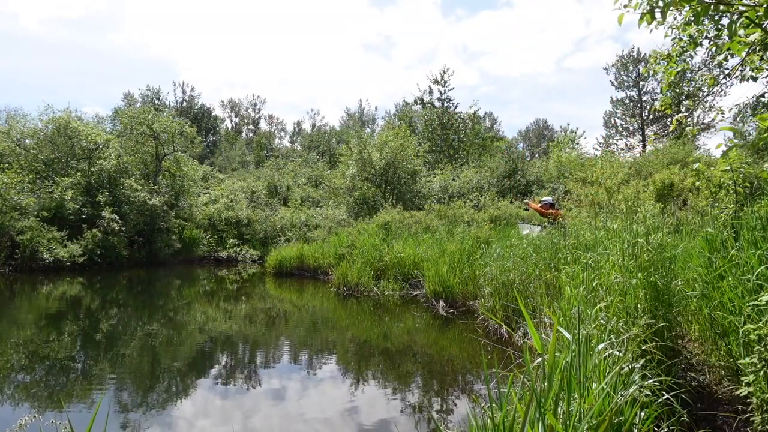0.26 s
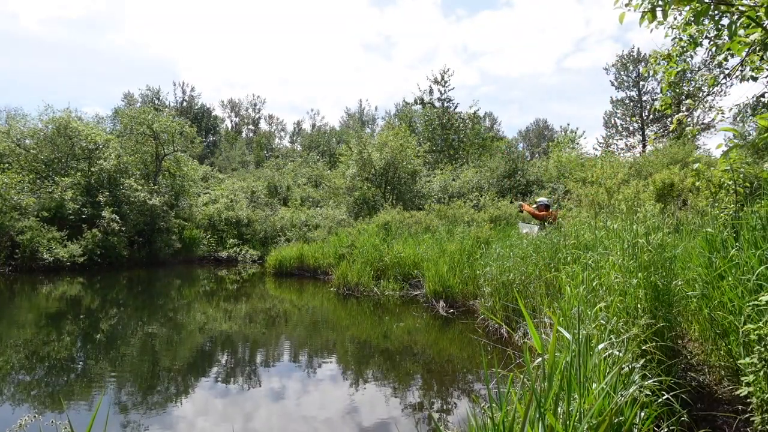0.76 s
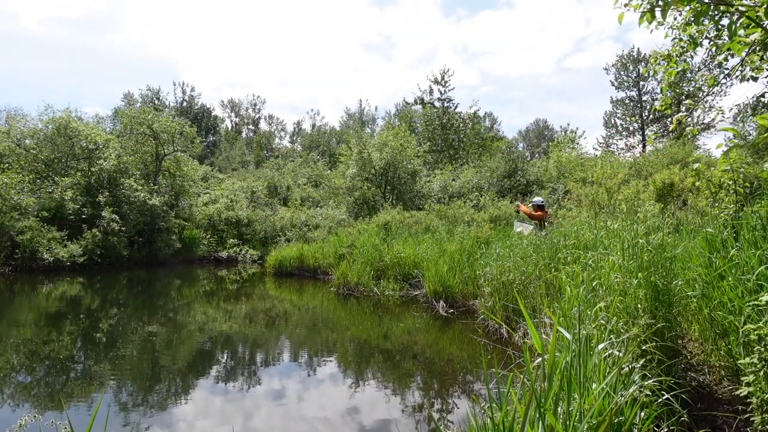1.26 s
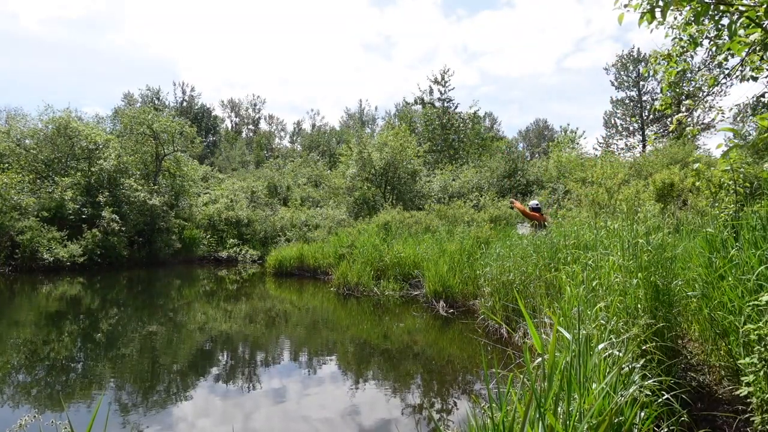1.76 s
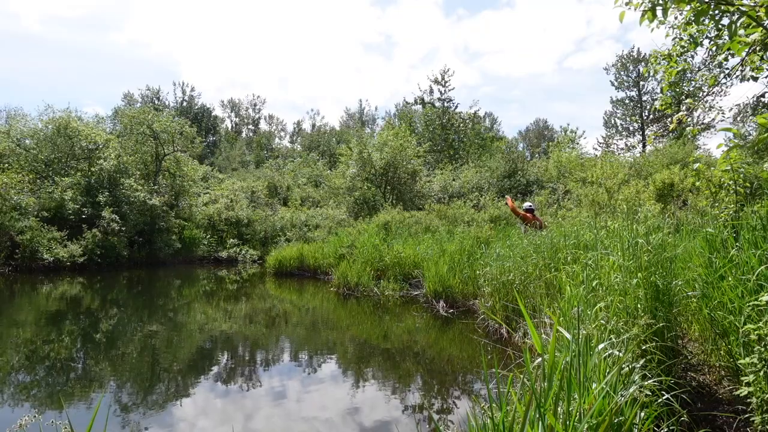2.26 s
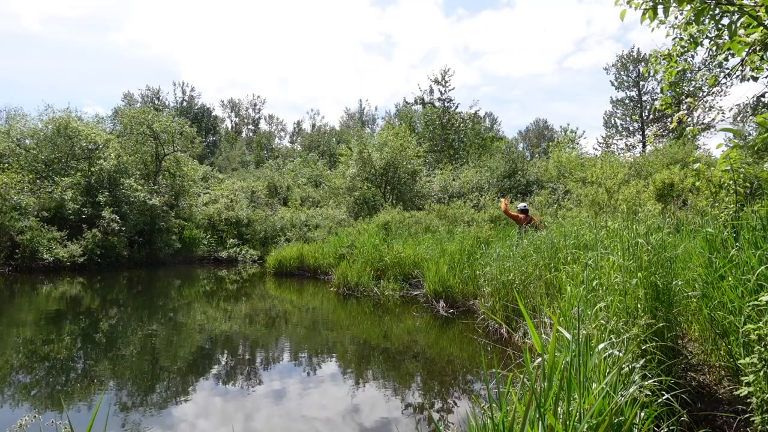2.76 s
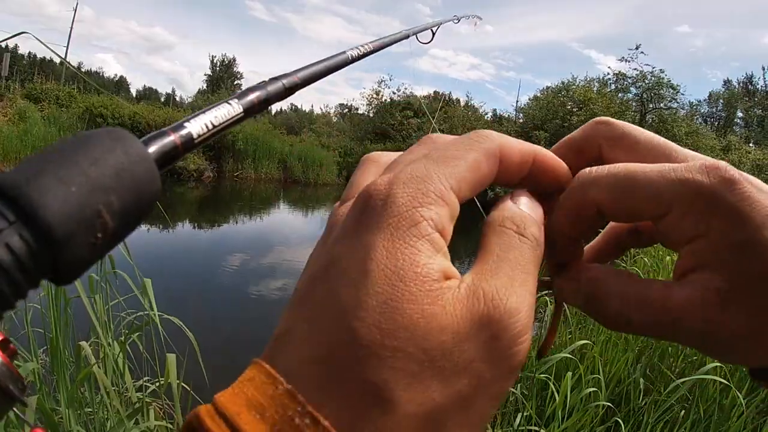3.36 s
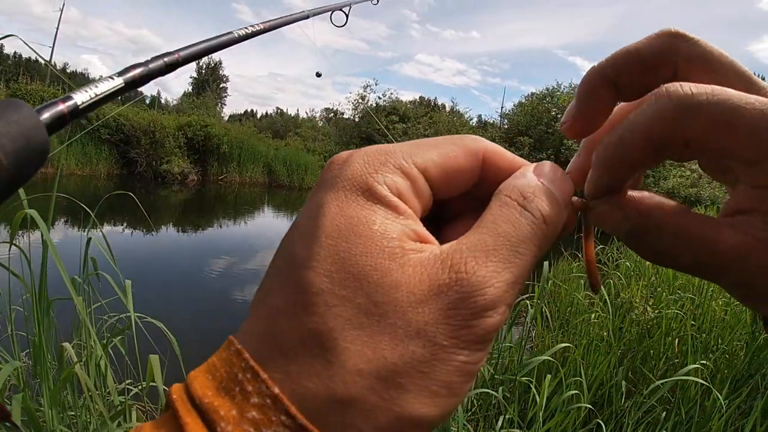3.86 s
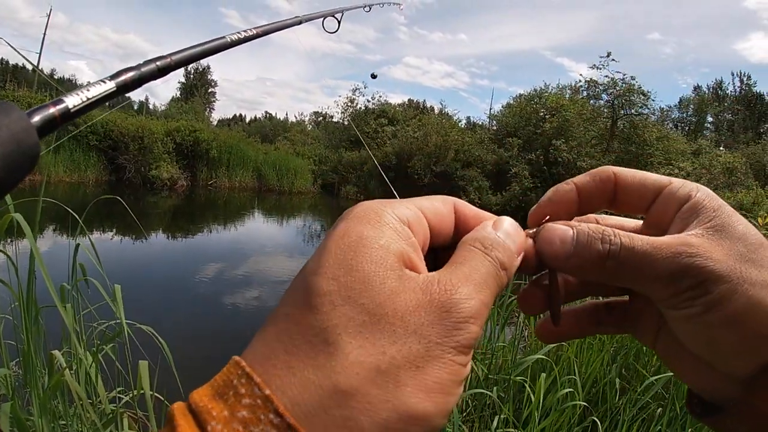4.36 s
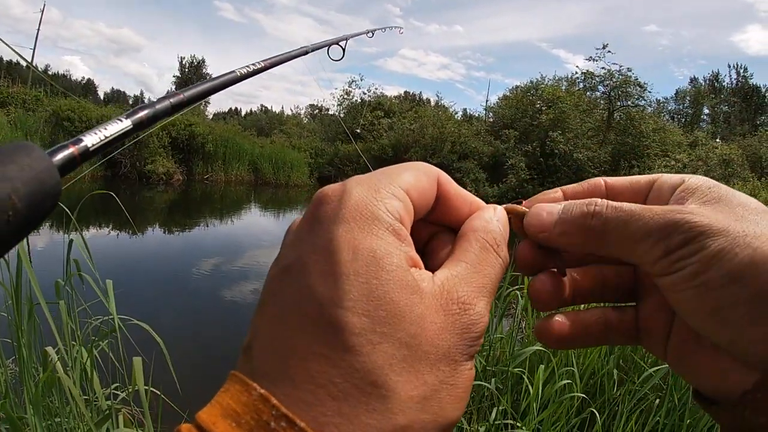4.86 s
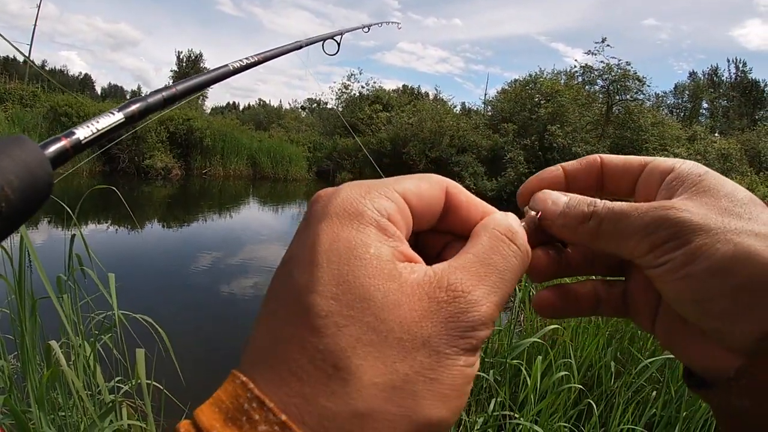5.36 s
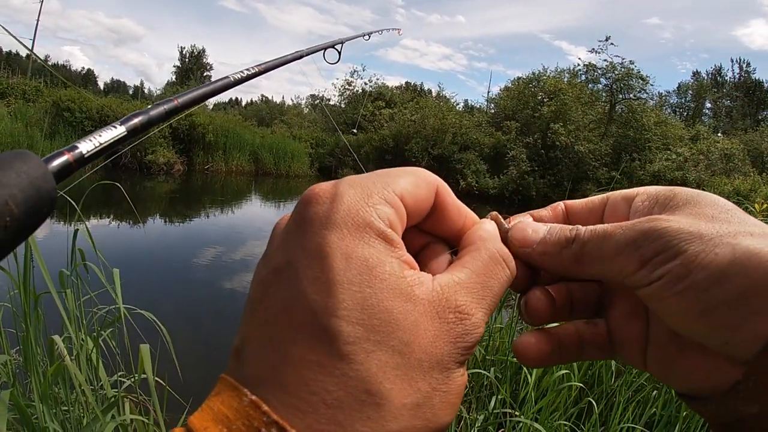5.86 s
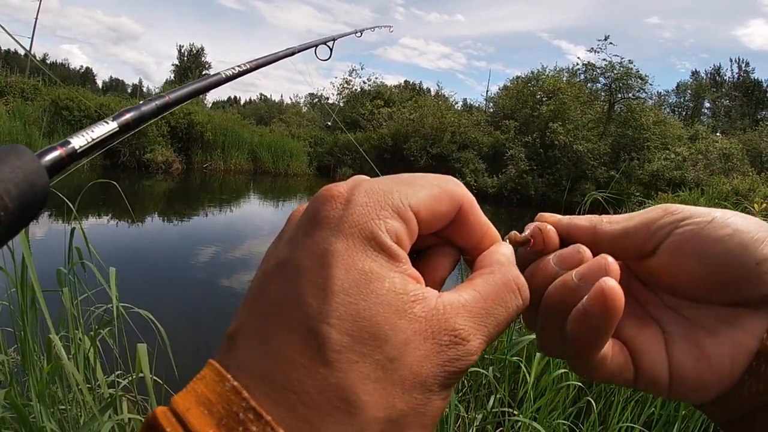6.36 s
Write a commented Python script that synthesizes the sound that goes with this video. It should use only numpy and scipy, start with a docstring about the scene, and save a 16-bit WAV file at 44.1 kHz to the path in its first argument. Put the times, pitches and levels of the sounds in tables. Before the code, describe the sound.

Steps rustle through tall grass while a bird buzzes, then a fishing reel clacks and wind rumbles on the microphone.

```python
"""Someone wades through tall grass on a summer pond bank, heard in stereo: on the right, blades rub and
stalks snap; on the left, a blackbird's vibrating membranes whistle and buzz. Far off, air rushes and an
engine drones at multiples of its firing rate. The scene then changes to mono, beside a fishing rod: the
reel's clacks excite the rod's modes, eddies of a breeze rumble on the microphone, leaves hiss, small
birds whistle and two soft, dull thuds sound in the wind."""
import sys
import numpy as np
from scipy import signal
from scipy.fft import rfft, irfft
from scipy.io import wavfile

SR = 44100
rng = np.random.default_rng(int(sys.argv[2]) if len(sys.argv) > 2 else 0)


def materialize(psi):
    """Save the field psi as 16-bit PCM at rate SR to the path in sys.argv[1].

    A 1-D psi becomes a single channel; in a 2-D psi each row is a channel.
    """
    bounded = np.clip(np.atleast_2d(psi).T, -1, 1)
    quanta = np.round(bounded * 32767).astype(np.int16)
    wavfile.write(sys.argv[1], SR, quanta)


N = 291942
TIME = np.arange(N) / SR
BUZZ_HZ = 296  # modulation rate of the blackbird's rasp and buzz


def amp(db):
    """Amplitude ratio of a level: a factor of ten for every 20 dB."""
    return 10 ** (np.asarray(db) / 20)


def unit(x):
    """Normalisation to rms 1."""
    return x / np.sqrt(np.mean(x ** 2) + 1e-20)


def read(points, hz):
    """Interpolation of a spectrum table on a logarithmic frequency axis."""
    f, value = np.transpose(points)
    return np.interp(np.log(hz + 1), np.log(f), value)


def swells(rows, rise_s, fall_s, rest_db):
    """Incoherent sounds add in power: level/dB of events that rise, hold and decay over a resting level."""
    power = amp(rest_db) ** 2
    for s, length, db in rows:
        rise = np.clip((TIME - s) / rise_s, 0, 1)
        fall = np.exp(-np.maximum(TIME - s - length, 0) / fall_s)
        power = power + (amp(db) * rise * fall) ** 2
    return 10 * np.log10(power)


def add(mix, s, sound):
    """Superposition of a sound on the mix, starting at time s."""
    part = mix[max(round(s * SR), 0):][:len(sound)]
    part += sound[:len(part)]


def wander(rate_hz):
    """Slow random fluctuation of rms 1: noise with a Gaussian roll-off at rate_hz."""
    hz = np.fft.rfftfreq(N, 1 / SR)
    return unit(irfft(rfft(rng.standard_normal(N)) * np.exp(-(hz / rate_hz) ** 2), N))


def colour(x, points, band=(0, SR)):
    """Spectral shaping by a table, scaled so that the channels' mean has rms 1 inside the band."""
    hz = np.fft.rfftfreq(x.shape[-1], 1 / SR)
    shaped = rfft(x) * amp(read(points, hz))
    inside = irfft(shaped * (hz >= band[0]) * (hz <= band[1]))
    return irfft(shaped, x.shape[-1]) / np.atleast_2d(inside).mean(0).std()


def band_noise(n, low_hz, high_hz, order):
    """Band-limited noise of rms 1, n samples long."""
    band = signal.butter(order, [low_hz, high_hz], "band", fs=SR, output="sos")
    return unit(signal.sosfilt(band, rng.standard_normal(n)))


def spread(a, b, coherence, balance):
    """Mid-side mixing turns two independent signals into a stereo pair of given coherence and balance."""
    hz = np.fft.rfftfreq(N, 1 / SR)
    same = np.clip(read(coherence, hz), -1, 1)
    lean = amp(read(balance, hz) / 2)
    mid = rfft(a) * np.sqrt((1 + same) / 2)
    side = rfft(b) * np.sqrt((1 - same) / 2)
    return irfft(np.array([(mid + side) * lean, (mid - side) / lean]), N)


def crackle(per_s, scatter_db):
    """A Poisson process of clicks, mostly small, a few large."""
    size = amp(scatter_db * np.minimum(rng.exponential(1, N), 4))
    return unit(size * rng.standard_normal(N) * (rng.random(N) < per_s / SR))


def rush():
    """Distant moving air gives dull, partly coherent noise that swells at times and slowly dies down."""
    surges = [(-.1, 0.62, -59.5), (1.0, 0.58, -64), (2.25, 0.18, -61)]  # swells of the air: t/s, duration/s, level/dB
    spectrum = [(35, -27), (57, -19), (70, -2.5), (120, 8.5), (170, 5), (260, 0), (430, -1.5), (900, 3.5),
                (1600, -4), (2600, -10.5), (6000, -20.5), (15000, -35)]  # spectral density: f/Hz, relative level/dB
    coherence = [(100, 1), (300, 0.596), (700, 0.518), (1300, 0.32), (5000, 0.66), (13000, 0.88)]  # likeness of left and right: f/Hz, coherence
    balance = [(200, 0), (400, -1.5), (700, -2), (1250, -7), (2500, -2), (12000, 0)]  # left minus right: f/Hz, level/dB
    pair = spread(*rng.standard_normal((2, N)), coherence, balance)
    air = colour(pair, spectrum, band=(750, 1400))
    level_db = swells(surges, rise_s=.097, fall_s=.097, rest_db=-58.5 - .37 * TIME)
    return air * amp(level_db + .5 * wander(17))


def stems(ticks_per_s=70):
    """Thin stems of many sizes tick at random, each a heavily damped oscillator."""
    out, t = np.zeros(N), TIME[:600]
    pitches = np.geomspace(1300, 4200, 14)
    for hz in pitches:
        ring = np.sin(2 * np.pi * hz * t) * np.exp(-t * hz / 2)
        out += signal.oaconvolve(crackle(ticks_per_s / len(pitches), scatter_db=2.5), ring)[:N]
    return unit(out)


def grass():
    """Friction and fracture: blades slide and tick at each push, and stalks snap in bursts of noise."""
    pushes = [(-.06, 0.2, -72), (.1, 0.232, -67.5), (.53, 0.036, -69.5), (1.01, 0.5, -71), (1.5, 0.39, -71),
              (1.88, 0.22, -68), (2.14, 0.36, -69), (2.27, 0.052, -70), (2.45, 0.17, -66.5),
              (2.58, 0.17, -64), (2.78, 0.25, -71.5), (3.05, 0.29, -67.5)]  # legs pushing through: t/s, duration/s, level/dB
    spectrum = [(500, -26), (1500, -4), (2500, 2.5), (4000, 0.5), (6500, -1), (8500, -5), (11000, -15),
                (15500, -24)]  # spectral density of the swish: f/Hz, relative level/dB
    balance = [(1000, 1), (4000, -7.5), (8000, -12), (13000, -2)]  # left minus right: f/Hz, level/dB
    stalks = [(.27, -59, 3600, .008), (.633, -59, 7000, .005), (.702, -63, 8300, .005),
              (1.085, -60, 2300, .06), (1.167, -52, 1650, .012), (1.228, -52.5, 1400, .007),
              (1.340, -48.5, 1750, .006), (1.349, -48.5, 3000, .006), (1.444, -54, 1550, .007),
              (1.480, -55, 1450, .007), (1.537, -47.5, 2350, .008), (1.642, -52.5, 1500, .008),
              (1.982, -58, 3400, .012), (2.283, -54, 1800, .007), (2.338, -57.5, 3200, .015),
              (2.392, -55.5, 1900, .035), (2.434, -54.5, 1900, .028), (2.475, -58.5, 2800, .02),
              (2.62, -59, 3200, .05), (2.67, -54, 3100, .01), (2.703, -54, 4100, .008),
              (2.937, -54.5, 1400, .008), (3.221, -54.5, 1700, .025)]  # stalks crushed underfoot: t/s, level/dB, f/Hz, decay time/s
    coherence = [(1000, .79), (8000, .27), (13000, .46)]  # f/Hz, coherence
    blades = [crackle(1200, scatter_db=2.7) + rng.standard_normal(N) for _ in range(2)]
    swish = colour(spread(*blades, coherence, balance), spectrum, band=(4500, 10000))
    # the blades bend quickly and settle slowly
    push = amp(swells(pushes, rise_s=.063, fall_s=.14, rest_db=-84.5) + 1.15 * wander(18))
    snaps = amp(-3) * stems() * push
    t = TIME[:8000]
    for s, db, hz, decay_s in stalks:
        fibres = band_noise(len(t), hz * .71, hz * 1.043, order=3)
        add(snaps, s, amp(db) * fibres * np.exp(-t / decay_s))
    return swish * push + snaps * amp([[-3], [2]])


def engine(firing_hz=73.5, load_s=1.93):
    """Periodic firing drones; one cylinder in four hits harder, driving a resonance at quarter orders."""
    hum_orders = [(1, -65.5), (2, -65.5)]  # low hum: multiple of the firing rate, level/dB
    howl_orders = [(7.25, -11), (7.5, -12), (8, -4), (8.25, 0), (8.5, -6), (8.75, -8), (9, -8), (9.25, -5)]  # hollow howl: multiple of the firing rate, relative level/dB
    surges = [(-.1, 0.22, -57.5), (1.36, 0.19, -59.5), (1.85, 0.45, -55), (2.78, 0.2, -61)]  # surges of the howl: t/s, duration/s, level/dB
    rise_s, idle_db = .089, -67.5
    firings = np.cumsum(firing_hz * (1 + .00205 * wander(2.27))) / SR

    def partial(order, db):
        """A sinusoid locked to the firing rate, its rms level fluctuating about db."""
        gain = np.sqrt(2) * amp(db + 2.75 * wander(26))
        return gain * np.sin(2 * np.pi * (order * firings + rng.random()))

    howl_db = swells(surges, rise_s, fall_s=.052, rest_db=idle_db)
    load = np.clip((TIME - load_s) / rise_s + .5, 0, 1)
    drone_db = -57.5 - 3 * TIME - 3.5 * load  # fades as the engine draws away, drops under load
    throb_db = -66.5 + .35 * (howl_db - idle_db)
    drone = sum(partial(order, db) for order, db in hum_orders)
    drone += partial(3, drone_db) + partial(3 / 2, throb_db)
    howl = np.zeros((2, N))
    for order, db in howl_orders:
        phase = 2 * np.pi * (order * firings + rng.random()) + .55 * wander(5.3)  # wavers in the air
        howl += amp(db) * np.sin([phase, phase + .5 * wander(4.1)])
    return drone + unit(howl) * amp(howl_db) * amp([[1.5], [-1.5]])


def syllable(rows, sidebands=((0, 0),), buzz_hz=0, shake_hz=130):
    """Start time and sound of a bird's tone; modulation by a second membrane may add sidebands."""
    times, *columns = np.transpose(rows)
    t = np.arange(times.min(), times.max(), 1 / SR)
    hz, db, roughness = (np.interp(t, times, column) for column in columns)
    lowpass = signal.butter(3, shake_hz, fs=SR)
    tone = np.zeros(len(t))
    for step, side_db in sidebands:
        cycles = np.cumsum(hz + step * buzz_hz) / SR + step ** 2 / 4
        phase_noise = 2 * roughness * unit(signal.lfilter(*lowpass, rng.standard_normal(len(t))))
        tone += amp(side_db) * np.sin(2 * np.pi * cycles + phase_noise)
    return times[0], unit(tone) * amp(db) * signal.windows.tukey(len(t), .08)


def phrase():
    """The blackbird's plain notes: nearly pure tones that glide linearly under a tapered envelope."""
    notes = [(.324, .12, 2323, 2323, -57.5, 0.01), (.443, 0.034, 2195, 2037, -58, 0.2),
             (.494, 0.046, 3405, 3326, -53, 0.2), (.530, 0.0213, 2700, 2655, -63.5, 0.29),
             (.942, 0.065, 2670, 2665, -59, 0.2)]  # notes: t/s, duration/s, start f/Hz, end f/Hz, level/dB, roughness
    out = np.zeros(N)
    for s, length, start_hz, end_hz, db, roughness in notes:
        _, note = syllable([(s, start_hz, db, roughness), (s + length, end_hz, db, roughness)])
        add(out, s, note * signal.windows.tukey(len(note), .55))
    return out


def woods(x, t60):
    """Scattering by the trees round the pond: sparse, decaying echoes, different at each ear."""
    t = TIME[:SR]
    taps = rng.standard_normal((2, SR)) * (rng.random((2, SR)) < .05)
    taps *= amp(-60 * t / t60) * (t > .012)
    return signal.fftconvolve(x[None], taps / np.linalg.norm(taps[0]), axes=1)[:, :N]


def rasp():
    """Strong phase noise smears a high tone and its sidebands into a rasp."""
    contour = [(.559, 5210, -46, 0.88), (.565, 5460, -60, 0.45), (.578, 5360, -54, 0.43),
               (.588, 5340, -58, 0.2), (.615, 5424, -67, 0.41)]  # course of the rasp: t/s, f/Hz, level/dB, roughness
    sidebands = [(-2, -3), (-0.84, 1), (0, 2.5), (1, -2)]  # components: offset/BUZZ_HZ, relative level/dB
    return syllable(contour, sidebands, BUZZ_HZ)


def buzz(register_s=.748, ease_s=.022):
    """A modulated tone shifts weight to its upper sidebands as the register changes, then turns rough."""
    contour = [(.582, 3312, -56.5, .12), (.61, 3326, -49.3, .12), (.68, 3320, -47.3, .15),
               (.73, 3316, -47.5, .15), (.772, 3331, -47.8, .13), (.82, 3322, -48, .15),
               (.86, 3298, -49.7, .24), (.885, 3284, -50.7, .6), (.915, 3290, -51.5, .65),
               (.942, 3295, -56.5, .65)]  # course of the buzz: t/s, f/Hz, level/dB, roughness
    registers = [(-1, -15, -12.5), (-.5, -12, -16), (0, 0, 0), (1, -13, -5.5), (2, -5, -4), (3, -27, -23)]  # components: offset/BUZZ_HZ, early and late relative level/dB
    t = np.arange(contour[0][0], contour[-1][0], 1 / SR)
    late = np.clip((t - register_s) / ease_s + .5, 0, 1)
    sidebands = [(step, early_db + (late_db - early_db) * late) for step, early_db, late_db in registers]
    return syllable(contour, sidebands, BUZZ_HZ, shake_hz=70)


def blackbird():
    """Direct song from bushes on the left, plus reflections; swaying leaves modulate the far echo."""
    song = phrase()
    add(song, *rasp())
    add(song, *buzz())
    far_echo = amp(-8.5) * woods(song * wander(45), t60=2.1)
    near_echo = amp(-12) * woods(song, t60=.3)
    return song * amp([[2.5], [-3.5]]) + far_echo + near_echo


def engine_knocks(ring_hz=622, rise_s=.0012, t60=.045):
    """Impulse response of a hollow resonance, struck by the engine's hardest knocks under load."""
    knocks = [(1.914, -47.5), (1.969, -45), (2.011, -35.5), (2.025, -42.5), (2.133, -39.5), (2.186, -43),
              (2.243, -43), (2.296, -48)]  # knocks: t/s, level/dB
    out, t = np.zeros(N), TIME[:8192]
    ring = amp(-60 * t / t60) * (1 - np.exp(-t / rise_s)) * np.sin(2 * np.pi * ring_hz * t)
    for s, db in knocks:
        add(out, s, amp(db) * ring)
    return out


def reel(rise_s=.0026, favour_octaves=.085):
    """Impacts in the reel excite damped modes; the spot struck favours some, the grip sets the decay."""
    # clacks: t/s, snap level/dB, ring level/dB, decay time factor, low and high favoured f/Hz,
    # their lift/dB, thump level/dB, tick level/dB
    clacks = [(3.3228, -49, -48.5, 0.93, 2900, 3725, 11, -79, -68),
              (3.3316, -43.5, -51.5, 1, 2800, 4165, 15, -64, -72),
              (3.3473, -50, -59, 0.96, 1695, 4300, 5, -78, -76),
              (3.3643, -52, -61, 0.8, 325, 4400, 11, -70, -69),
              (3.3928, -64, -66, 0.61, 1950, 4350, 11, -88, -76),
              (3.5666, -45, -45.5, 0.71, 2050, 3800, 7, -68, -60),
              (3.5815, -48.5, -59, 0.91, 1950, 4505, 12, -74, -74),
              (3.5958, -51, -54.5, 1.04, 1015, 4200, 14, -53, -56),
              (3.6119, -65, -55, 0.63, 2080, 4400, 5, -44, -70),
              (3.923, -56, -64, 0.62, 3000, 4550, 9.5, -74, -79),
              (4.288, -65, -66, .6, 2200, 4500, 0, -76, -77),
              (4.5744, -53, -57, 0.51, 1695, 4505, 9.5, -73, -75),
              (4.6300, -58, -60, 1.1, 2200, 4505, 7, -80, -70),
              (4.6362, -48, -51.5, 0.67, 3750, 4800, 12, -49, -63),
              (4.6485, -59, -59.5, 1.2, 2150, 4600, 8, -48.5, -67)]
    spectrum = [(200, -2), (1400, -6.5), (2400, -10), (3000, -4), (3400, -8.5), (3800, -3), (4700, -11.5),
                (5400, -16), (6400, -12.5), (7500, -30), (9000, -48), (14000, -63)]  # spectral density of a snap: f/Hz, relative level/dB
    rod_modes = [(331, -2, 0.14), (1027, -4.5, 0.068), (1430, -18, .09), (1695, -6.5, 0.073),
                 (1914, -8, .085), (2085, -4, 0.086), (2480, -9, 0.16), (2730, -7, 0.066), (2980, 0, 0.032),
                 (3760, -4.5, 0.03), (4020, -7, 0.027), (4190, -7, 0.028), (4505, -4.5, .044),
                 (4760, -1.5, 0.03), (5550, -17, .055), (6220, -10, 0.024), (6550, -12, 0.036),
                 (7100, -13, 0.022)]  # modes of rod and reel: f/Hz, relative level/dB, nominal T60/s
    snap_rise_s, snap_t60, tick_decay_s = .0005, .056, .0014
    thump_hz, thump_t60 = 165.6, .17  # the thump against the hand
    out, t = np.zeros(N), TIME[:8192]
    for s, snap_db, ring_db, damped, low_hz, high_hz, lift_db, thump_db, tick_db in clacks:
        snap = colour(rng.standard_normal(len(t)), spectrum)
        snap *= amp(snap_db - 60 * t / (damped * snap_t60)) * (1 - np.exp(-t / snap_rise_s))
        ring = np.zeros(len(t))
        for hz, mode_db, t60 in rod_modes:
            octaves_off = min(abs(np.log2(hz / spot_hz)) for spot_hz in (low_hz, high_hz))
            favour_db = lift_db * np.exp(-(octaves_off / favour_octaves) ** 2)
            rise = 1 - np.exp(-t * np.sqrt(hz / rod_modes[0][0]) / rise_s)  # high modes speak first
            decay = amp(ring_db + mode_db + favour_db - 60 * t / (damped * t60))
            ring += rise * decay * np.sin(2 * np.pi * (hz * t + rng.random()))
        thump = amp(thump_db - 60 * t / thump_t60) * np.sin(2 * np.pi * thump_hz * t)
        thump *= 1 - np.exp(-t / rise_s)
        tick = amp(tick_db) * band_noise(len(t), 5700, 8200, order=2) * np.exp(-t / tick_decay_s)
        add(out, s, snap + ring + thump + tick)
    return out


def breeze(mount_hz=53.2, dull_hz=93):
    """Turbulence buffets the microphone, rings its mount and flutters round its housing; leaves hiss."""
    strength = [(3.4, -15), (3.98, -9.5), (4.08, -2), (4.4, 0), (4.55, -3), (5.0, 1), (5.17, -1), (5.28, 7),
                (5.6, 1.5), (5.9, 1), (6.02, -1.5), (6.3, 3.5), (6.37, 3.5), (6.62, 0)]  # strength of the breeze: t/s, relative level/dB
    gusts = [(4.06, .05, -52), (4.135, 0.046, -41.5), (4.27, .06, -47), (4.36, 0.033, -44),
             (4.62, .05, -48), (4.75, 0.11, -45), (4.88, 0.09, -36), (4.98, 0.12, -41.5),
             (5.22, 0.05, -39.5), (5.35, 0.146, -39), (5.56, 0.23, -45.5), (5.78, 0.27, -38.5),
             (6.0, 0.35, -42), (6.35, 0.19, -36.5)]  # gusts on the microphone: t/s, duration/s, level/dB
    stirs = [(3.05, 0.87, -78), (4.0, 0.81, -76), (5.1, .32, -75.5), (5.4, 0.28, -76), (6.42, .3, -71.5)]  # leaves stirring: t/s, duration/s, level/dB
    mount_shares = [(-48, .05), (-38, .6)]  # resonance of the mount: buffeting level/dB, share of the power
    # spectral densities of buffeting, flutter and leaves: f/Hz, relative level/dB
    buffet_spectrum = [(10, -16), (28, -7), (45, 0), (72, 0), (100, -5), (130, -13), (250, -32), (500, -60),
                       (2000, -90)]
    flutter_spectrum = [(70, -16.5), (130, -6.5), (220, 3), (330, -6.5), (480, -13.5), (780, -19),
                        (1000, -25), (1550, -30), (2500, -34.5), (3400, -53), (6000, -72), (12000, -81)]
    leaf_spectrum = [(300, 18.5), (800, 6), (1600, 8), (2200, 1), (2900, 1.5), (3500, -1), (4300, -4.5),
                     (5200, -7.5), (6100, -8), (6800, -16.5), (8700, -20.5), (10000, -32), (15500, -31.5)]
    wind_db = np.interp(TIME, *np.transpose(strength))
    buffet_db = swells(gusts, rise_s=.025, fall_s=.044, rest_db=-49 + 1.1 * wind_db)
    flutter_db = -54.5 + .97 * wind_db + 1.39 * wander(25)
    leaf_db = swells(stirs, rise_s=.15, fall_s=.15, rest_db=-80.5 + .24 * wind_db) + .34 * wander(29)
    eddies = colour(rng.standard_normal(N), buffet_spectrum)
    dull = unit(signal.sosfiltfilt(signal.butter(3, dull_hz, fs=SR, output="sos"), eddies))
    brightness = np.clip(wind_db / .5, 0, 1)  # a light wind makes only large, dull eddies
    eddies = dull + (eddies - dull) * brightness
    mount = np.sqrt(2) * np.sin(2 * np.pi * mount_hz * TIME + .6 * wander(4))
    share = np.interp(buffet_db, *np.transpose(mount_shares))
    buffet = np.sqrt(1 - share) * eddies + np.sqrt(share) * mount
    flutter = colour(rng.standard_normal(N), flutter_spectrum, band=(170, 600))
    rustle = rng.standard_normal(N) + .3 * crackle(300, scatter_db=2)
    leaves = colour(rustle, leaf_spectrum, band=(1200, 3200))
    return buffet * amp(buffet_db) + flutter * amp(flutter_db) + leaves * amp(leaf_db)


def whistle(s, length, start_hz, end_hz, crest_db, roughness):
    """A power-law glide: the thin note is loudest early, and its pitch levels out as it fades."""
    progress = np.arange(0, length, 1 / SR) / length
    hz = end_hz + (start_hz - end_hz) * (1 - progress) ** 3.2
    db = crest_db + np.interp(progress, [0, .38, 1], [-8, 0, -13])
    return syllable(np.column_stack([s + progress * length, hz, db, np.full(len(hz), roughness)]))


def small_birds():
    """Far, flickering whistles and one nearer, arched chirp, with their reflections from the bushes."""
    calls = [(3.95, 0.3, 3512, 3540, -88.5, 0.27), (4.074, 0.29, 6000, 5960, -90, 0.7),
             (4.681, .6, 4370, 4020, -76, 0.17), (4.658, 0.74, 6080, 5945, -92.5, .9),
             (5.275, 0.36, 4330, 4110, -75.5, 0.56), (5.385, 0.47, 4170, 4030, -81, .3),
             (5.692, 0.16, 3925, 3623, -83, 0.3), (6.197, 0.44, 4050, 4010, -81.5, 1)]  # whistles: t/s, duration/s, start f/Hz, end f/Hz, level/dB, roughness
    arch = [(6.036, 2105, -81, 0.26), (6.045, 2520, -69, 0.26), (6.054, 3220, -59, 0.51),
            (6.058, 3820, -67, 0.55), (6.063, 4440, -61, 0.55), (6.071, 4986, -76, 0.55),
            (6.078, 4600, -61, .5), (6.082, 3278, -64.5, 0.57), (6.091, 2100, -78.5, 0.34)]  # course of the chirp: t/s, f/Hz, level/dB, roughness
    lead = [(6.03, 3630, -83.5, .1), (6.04, 4450, -75, .3), (6.052, 5770, -87.5, .1)]  # upper voice that leads it: t/s, f/Hz, level/dB, roughness
    whistles, chirp = np.zeros((2, N))
    for call in calls:
        add(whistles, *whistle(*call))
    whistles *= amp(wander(18))  # flicker of 1 dB rms
    add(chirp, *syllable(arch))
    add(chirp, *syllable(lead))
    echoes = woods(amp(-6) * chirp + amp(-7) * whistles, t60=.35)[0]
    return whistles + chirp + echoes


def thuds(rise_s=.002, decay_s=.014):
    """Two soft, dull thuds in the wind: bursts of band-limited noise with an exponential decay."""
    bursts = [(5.894, -50, 600), (6.366, -48.5, 520)]  # thuds: t/s, level/dB, centre f/Hz
    out, t = np.zeros(N), TIME[:4096]
    envelope = (1 - np.exp(-t / rise_s)) * np.exp(-t / decay_s)
    for s, db, hz in bursts:
        add(out, s, amp(db) * band_noise(len(t), hz * .6, hz * 1.45, order=4) * envelope)
    return out


def scene(leave_s=3.277, arrive_s=3.321):
    """Sources superpose at two places in turn: the open bank and, after a brief hush, beside the rod."""
    bank = rush() + grass() + engine() + blackbird() + engine_knocks()
    beside_rod = reel() + thuds() + breeze() + small_birds()
    leave = np.clip((leave_s - TIME) / .006 + .5, 0, 1)
    arrive = np.clip((TIME - arrive_s) / .002, 0, 1)
    return bank * leave + beside_rod * np.maximum(arrive, amp(-27) * (1 - leave))


def record(dry, edge_hz=15700):
    """Band limiting by a linear-phase low-pass filter."""
    lowpass = signal.firwin(511, edge_hz, window=("kaiser", 9), fs=SR)
    return signal.oaconvolve(dry, lowpass[None], "same")


dry = scene()
out = record(dry)
materialize(out)
```